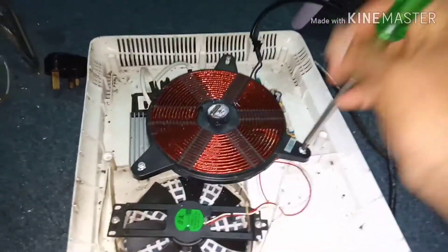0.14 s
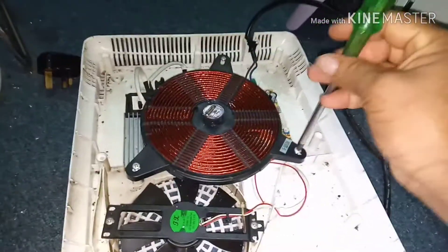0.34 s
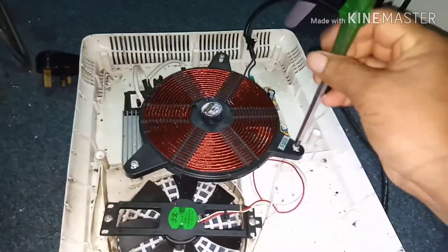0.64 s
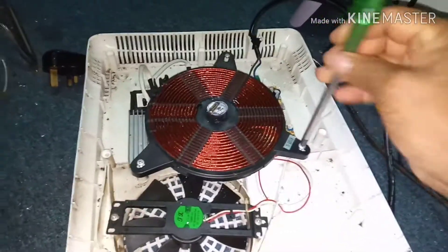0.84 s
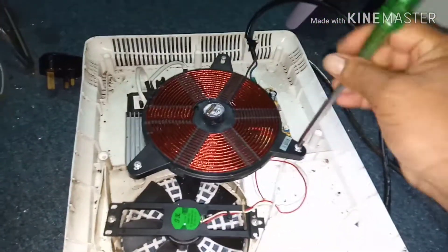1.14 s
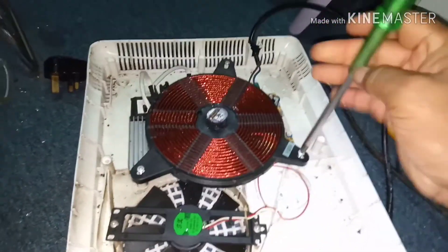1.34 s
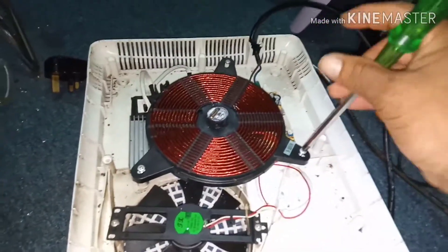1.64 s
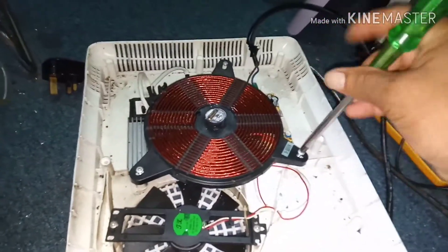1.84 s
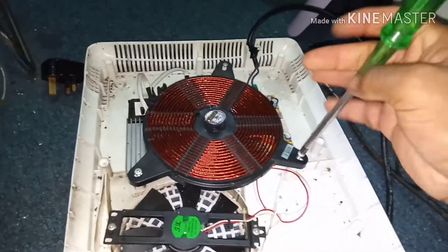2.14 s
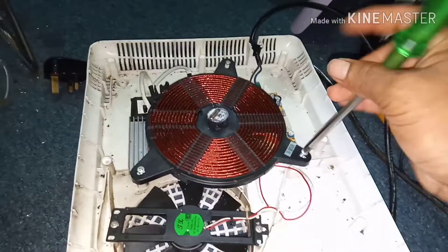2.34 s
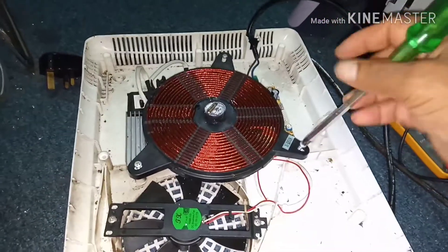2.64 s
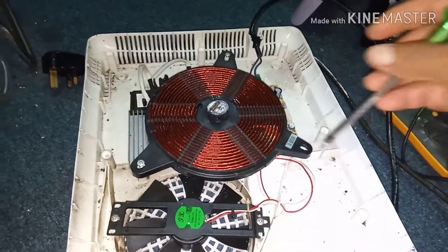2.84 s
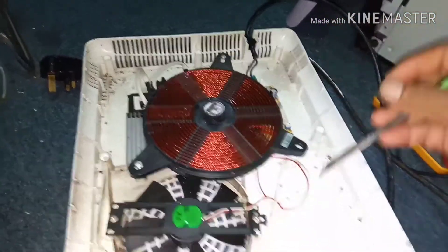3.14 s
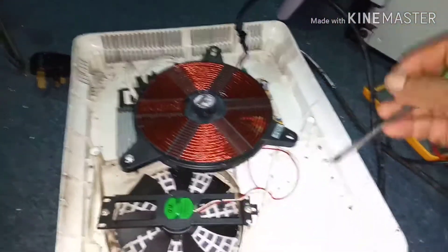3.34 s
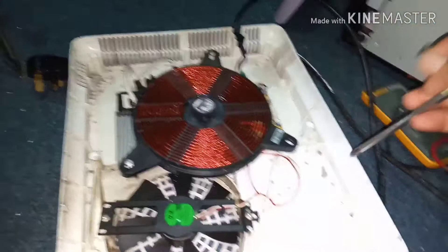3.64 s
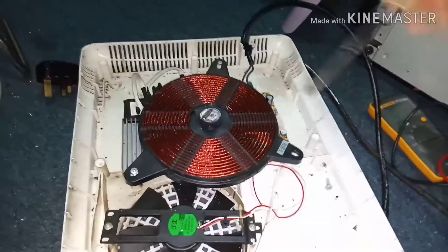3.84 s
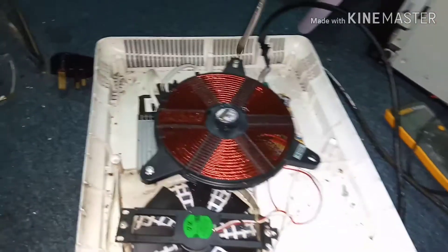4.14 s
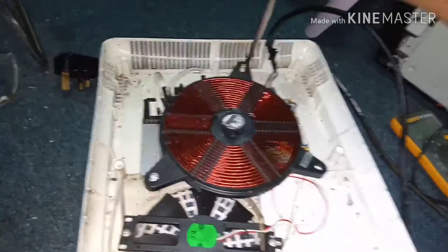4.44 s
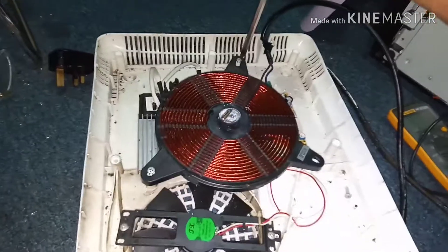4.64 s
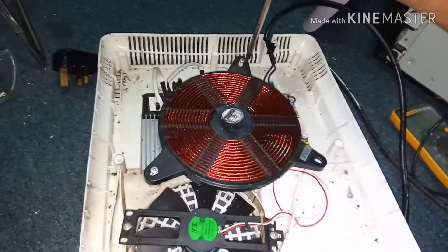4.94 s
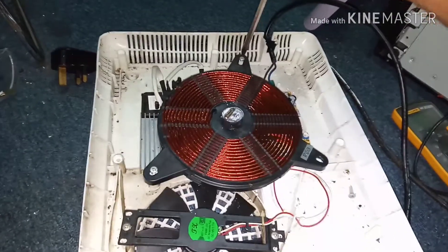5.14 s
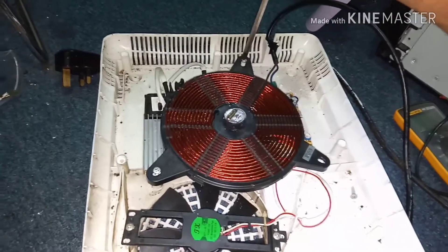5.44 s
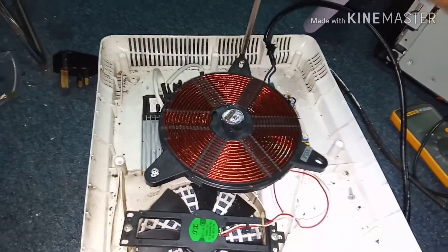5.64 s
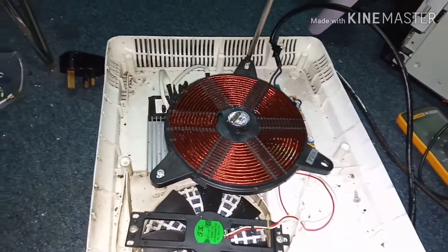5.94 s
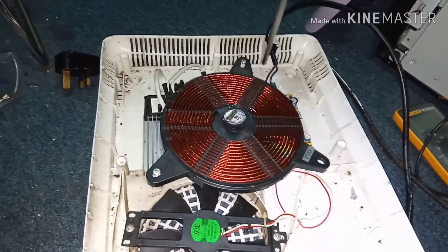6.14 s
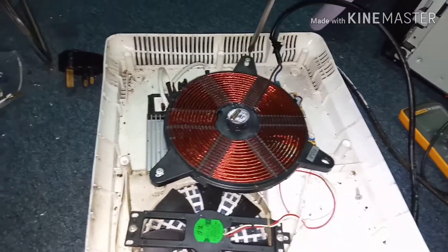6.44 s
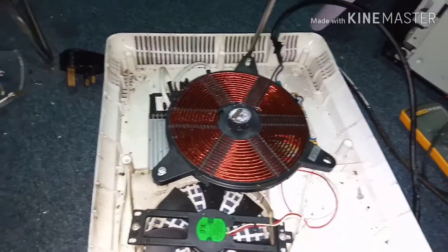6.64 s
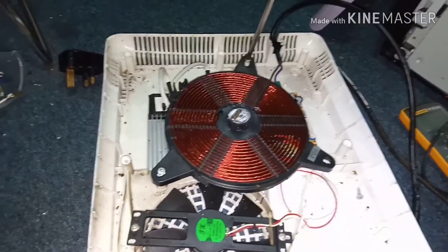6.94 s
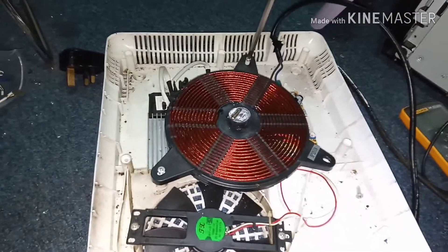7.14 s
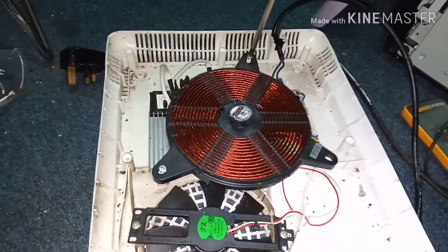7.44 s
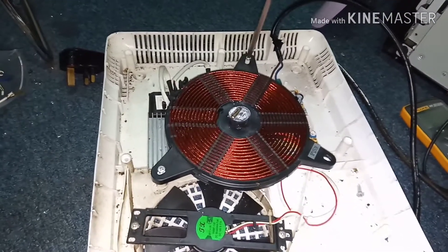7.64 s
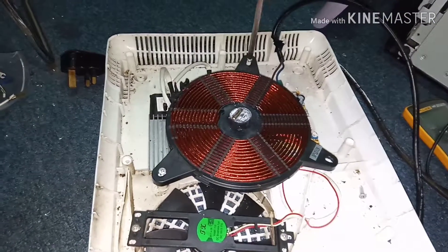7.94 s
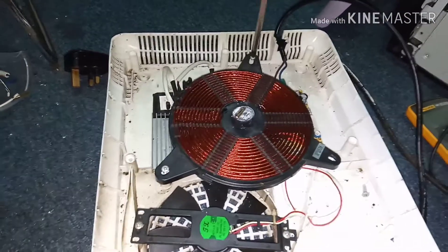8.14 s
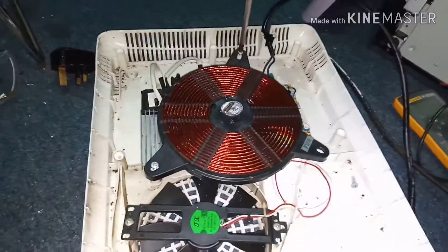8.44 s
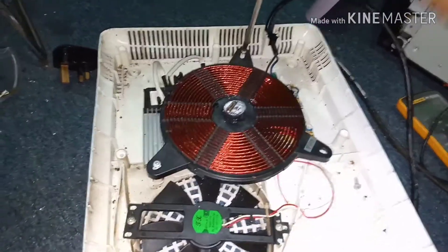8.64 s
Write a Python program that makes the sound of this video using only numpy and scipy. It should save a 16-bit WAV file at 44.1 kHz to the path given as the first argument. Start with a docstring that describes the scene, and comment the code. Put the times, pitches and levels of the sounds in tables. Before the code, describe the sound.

A screwdriver works small screws in a thin plastic housing, heard close with short, quiet reflections. Soft grip rustles and small metallic ticks and scrapes come first, then a brief bright clatter of steel on plastic. After over a second of only hum, hiss and faint handling, irregular loud knocks snap out, the strongest about two thirds through, before small ticks and soft rustling end it.

```python
"""First come fingers rustling on a handle, over a faint hum and hiss, close up in a small dead room.
A screwdriver backs small screws out of the plastic shell of an opened cooker: its blade ticks and grinds
in the screw heads, slips out with hard knocks, and clatters once against the shell.
Contacts and stick-slips ring resonances of plastic and steel, with short, quiet reflections;
hand, room and microphone are shaped noise, the hum a sine."""
import sys
import numpy as np
from scipy import signal
from scipy.io import wavfile

SR = 44100
rng = np.random.default_rng(int(sys.argv[2]) if len(sys.argv) > 2 else 0)


def wav_out(sig):
    """Save sig, one row per channel (or a flat mono array), as 16-bit PCM at SR to the path in sys.argv[1]."""
    wavfile.write(sys.argv[1], SR, np.round(np.clip(np.atleast_2d(sig).T, -1, 1) * 32767).astype(np.int16))


N = 388521
TIME = np.arange(N) / SR   # s, the whole scene
BLOW = np.arange(SR // 5) / SR   # s, one contact and its ring-out

# resonances of the whole plastic shell: (f/Hz, width/Hz, level/dB)
SHELL_MODES = [(208.6, 31, -2), (315, 78, -2), (440, 120, -11.5), (640, 68, -7)]
# resonances of the steel of the tool and screw: (f/Hz, width/Hz, level/dB)
STEEL_MODES = [(2220, 540, -4.5), (2680, 400, -2.5), (3022, 220, -3), (3717, 440, -14), (4400, 330, -17)]


def jumps():
    """The blade jumps out of the slot with a hard click and lands again just after."""
    # jumps: (t/s, panel peak about/dB, steel clack/dB, panel tilt/dB per octave, rattle/dB, rebound/dB);
    # clack and rebound are relative to the panel
    jump_rows = [(5.027, -25, -12, -7, -19, -25), (5.283, -7.5, -9.5, 1.5, -13.5, -13.5),
                 (5.914, -16, -7.5, -2, -15, -27), (6.095, -3.5, -19, 0, -15.5, -14),
                 (6.235, -9.5, -9.5, -6.5, -18, -27.5), (6.629, -11, -13, -1, -23.5, -18),
                 (6.872, -20.5, -12, 3, -38, -27), (7.357, -16.5, -13, -3.5, -12.5, -28),
                 (7.522, -8.5, -11, -6.5, -28.5, -22)]
    thump_db = -18   # relative to the panel
    full_scale_snap_db, snap_per_db = -28.5, 0.38   # relative to the clack; weaker jumps snap less
    rebound_delay_s, rebound_clack_db = .013, 0
    out = np.zeros(N)
    for s, db, clack_db, tilt_db, rattle_db, rebound_db in jump_rows:
        snap_db = clack_db + full_scale_snap_db + snap_per_db * db
        jump = blow(thump_db, clack_db, snap_db, tilt_db, rattle_db)
        add(out, s, from_db(db) * room(jump))
        rebound = touch(rebound_clack_db, edge_hz=4500)
        add(out, s + rebound_delay_s, from_db(db + rebound_db) * rebound)
    return out


def knocks():
    """The tool strikes the shell and clatters; the more steel in the contact, the brighter the panel."""
    # knocks: (t/s, panel peak about/dB, shell thump/dB, steel clack/dB, edge snap/dB);
    # the last three are relative to the panel
    knock_rows = [(1.806, -22, -3, -12.5, -37.5), (3.099, -13, -10, -7.5, -33),
                  (3.119, -32.5, -20, 8.5, -29), (3.144, -26.5, -12, -1.5, -47),
                  (3.234, -17.5, -2.5, -7.5, -29.5), (3.37, -10, -6.5, 3, -30.5),
                  (3.393, -16, -27.5, 7.5, -11.5), (3.431, -37, -31, 12, -7.5), (3.441, -24, -26, 7.5, -10),
                  (3.459, -31.5, -24, -1.5, -31), (3.489, -11, -12.5, -1.5, -26.5)]
    base_tilt_db, tilt_per_clack = 1.83, .2   # dB per octave, and its rise per dB of clack
    out = np.zeros(N)
    for s, db, thump_db, clack_db, snap_db in knock_rows:
        tilt_db = base_tilt_db + tilt_per_clack * clack_db
        knock = blow(thump_db, clack_db, snap_db, tilt_db, rattle_db=-17.5)
        add(out, s, from_db(db) * room(knock))
    return out


def ticks():
    """The blade shifts in the screw head; firmer ticks ring the steel more."""
    # light ticks: (t/s, level before softening/dB)
    tick_rows = [(0.878, -40.5), (1.257, -35.5), (1.288, -34), (1.317, -40), (1.335, -29.5), (1.388, -37.5),
                 (1.525, -36), (1.921, -34), (2.041, -30), (2.085, -36.5), (2.328, -29.5), (2.472, -29.5),
                 (2.746, -36.5), (6.073, -28), (6.788, -34.5), (7.153, -31), (7.517, -23), (7.655, -42.5),
                 (7.892, -45.5), (7.928, -35.5), (8.131, -44), (8.235, -35), (8.428, -33.5)]
    typical_db, typical_clack_db = -35, -15.5   # clack relative to the panel
    clack_per_db = .5
    out = np.zeros(N)
    for s, db in tick_rows:
        clack_db = typical_clack_db + clack_per_db * (db - typical_db)
        add(out, s, from_db(db) * touch(clack_db, edge_hz=3400))
    return out


def grinding(slips_per_s=400, clack_db=-9, thump_db=-7):
    """Tiny stick-slips of uneven size under each turn of the blade ring panel, steel and shell."""
    # grinds, before the room: (middle t/s, half length/s, level/dB)
    grind_rows = [(.45, 0.15, -69.5), (0.9, 0.068, -58.5), (1.273, 0.036, -48), (1.355, 0.057, -54.5),
                  (1.943, 0.028, -50), (2.052, 0.019, -42.5), (2.345, 0.042, -51), (2.475, 0.035, -52.5),
                  (2.7, 0.089, -59.5), (5.919, 0.0057, -22.5), (6.058, .006, -40), (6.072, 0.0039, -31),
                  (6.786, 0.014, -50), (7.153, 0.0081, -44), (7.664, 0.026, -50.5), (8.336, 0.072, -58)]
    sizes_db = 4 * np.minimum(rng.exponential(1, N), 3)
    sizes = rng.choice([-1, 1], N) * from_db(sizes_db)
    slips = (rng.random(N) < slips_per_s / SR) * sizes
    body = panel(slips, tilt_db=2.5)
    body = body + from_db(clack_db) * resonate(slips, STEEL_MODES)
    body = body + from_db(thump_db) * resonate(slips, SHELL_MODES)
    body = soften(body, edge_hz=3540)
    return swells(grind_rows) * body / rms(body)


def touch(clack_db, edge_hz):
    """A light contact of the blade with the screw, softened by a low-pass."""
    tick = blow(thump_db=-21.5, clack_db=clack_db, snap_db=-33.5, tilt_db=-4.0, rattle_db=-11.5)
    return room(soften(tick, edge_hz, order=2))


def blow(thump_db, clack_db, snap_db, tilt_db, rattle_db):
    """A contact rings the plastic panel (peak near 1), the whole shell, the steel and its sharp edge."""
    # resonances of the steel's sharp edge: (f/Hz, width/Hz, level/dB)
    edge_modes = [(6260, 1300, -2.5), (8460, 1400, -4.5), (12400, 9100, -18.5)]
    # ringing modes of the coil and its metal parts: (f/Hz, level/dB)
    metal_modes = [(765, 2.5), (1125, -8), (1723, -6), (2130, -4), (2549, -2.5), (2640, -5), (2755, -7.5),
                   (3020, -4.5), (3268, -10), (3450, -9.5), (3892, -9)]
    metal_t60_s = .15
    force = contact(rattle_db)
    shell_tilt_db = -.8 * (max(thump_db, -24) + 13)   # heavier thumps favour the lowest mode
    shell = soften(resonate(force, SHELL_MODES, shell_tilt_db, scatter=1.0), edge_hz=4200, order=2)
    steel = soften(resonate(force, STEEL_MODES, scatter=1.0), edge_hz=4700, order=8)
    skid = rng.standard_normal(len(BLOW)) * from_db(-60 * BLOW / 0.029)   # the edge skids for a few ms
    edge = soften(resonate(skid, edge_modes, scatter=0.93), edge_hz=8600, order=2)

    # each part is levelled by its attack, with a small trim
    levels = ((0, panel(force, tilt_db)), (thump_db + 0.5, shell),
              (clack_db + 0.37, steel), (snap_db - 0.3, edge))
    parts = sum(from_db(db) * part / attack_rms(part) for db, part in levels)
    metal = 0
    for hz, db in metal_modes:
        metal = metal + from_db(db + rng.normal(0, 3)) * np.sin(2 * np.pi * hz * BLOW)
    metal = from_db(clack_db - 14.5 - 60 * BLOW / metal_t60_s) * metal
    return from_db(-11) * (parts + metal)   # from attack level to a peak near 1


def contact(rattle_db, bounce_db=-8):
    """One sharp push, a few ms of bouncing, then loose parts rattling out."""
    force = 1.0 * (BLOW == 0)
    for db, t60_s in ((bounce_db, .02), (rattle_db, .08)):
        grains = rng.standard_normal(len(BLOW)) ** 3   # cubing makes a few grains stand out
        grains = grains * from_db(-60 * BLOW / t60_s)
        force = force + from_db(db) * grains / np.linalg.norm(grains)
    return force


def panel(force, tilt_db, low_hz=800, high_hz=2000):
    """The small stiff panel radiates little below its first mode or above its last."""
    # resonances of the panel: (f/Hz, width/Hz, level/dB)
    panel_modes = [(950, 170, 0), (1090, 170, -2), (1290, 200, 0), (1470, 220, -1), (1680, 220, -6)]
    sos = signal.butter(4, [low_hz, high_hz], "band", fs=SR, output="sos")
    return signal.sosfilt(sos, resonate(force, panel_modes, tilt_db, scatter=1))


def resonate(force, modes, tilt_db=0, scatter=0):
    """Parallel resonances tilted in dB per octave; scatter shifts and weights them anew at each call."""
    out = 0
    for k, (hz, width, db) in enumerate(modes):
        shift, weight_db = rng.normal(0, (.015, 1.8)) * scatter
        r = np.exp(-np.pi * width / SR)   # pole radius: wider modes die sooner
        w = 2 * np.pi * hz * (1 + shift) / SR
        ringing = signal.lfilter([1, 0, -1], [1, -2 * r * np.cos(w), r * r], force + 1e-18)
        gain = from_db(db + tilt_db * np.log2(hz / modes[0][0]) + weight_db)
        out = out + (-1) ** k * gain * (1 - r * r) / 2 * ringing   # neighbours in opposite sign
    return out


def room(x, wet_db=-11, build_s=0.0016):
    """Reflections build up within a few ms and die quickly, in a fresh noise pattern at each call."""
    # the small dead room: (f/Hz, t60/s, level of the reflections/dB)
    room_rows = np.array([(150, .22, -0.5), (500, .18, 2), (1130, .15, -4), (2980, 0.13, 0),
                          (7000, 0.1, -0.5), (14000, .1, -3)])
    tail = 0
    for hz, noise in bands(len(BLOW), 100, 16000, count=9):
        level_db = at_hz(room_rows[:, ::2], hz)
        t60_s = at_hz(room_rows[:, :2], hz)
        tail = tail + noise * from_db(level_db - 60 * BLOW / t60_s)
    tail = tail * (1 - np.exp(-(BLOW / build_s) ** 2))
    reflections = signal.fftconvolve(x, tail / np.linalg.norm(tail))[:len(x)]
    return x + from_db(wet_db) * reflections


def background(hum_db=-64.0, rumble_db=-60, mic_db=-86.5):
    """Mains hum, low room noise, a wavering hiss, the hand on the handle and the microphone's own noise."""
    # the hand shifts its grip:
    # (middle t/s, half length/s, friction hiss level/dB, low handling level/dB, skin rustle level/dB)
    strokes = [(0.175, 0.23, -65, -68, -88), (0.74, 0.16, -67, -70, -79.5), (1.318, 0.078, -68, -61, -84),
               (2.127, 0.22, -61.5, -59, -79), (2.486, 0.045, -74, -57, -83),
               (2.944, 0.16, -66.5, -72.5, -76.5), (4.226, 0.37, -70, -69, -98.5),
               (6.853, 0.23, -66, -73, -98), (8.179, 0.52, -67, -71.5, -90)]
    # noise spectra of room, hand, friction and skin: (f/Hz, level/dB per Hz)
    rumble_spectrum = [(22, -24), (45, -11), (70, -2), (100, 1), (130, -3), (185, -1.5), (240, -15),
                       (330, -34)]
    handling_spectrum = [(200, 0), (300, -1), (450, -9), (700, -5), (1000, -13.5)]
    hiss_spectrum = [(800, -10.5), (1100, 1.5), (1700, 2.5), (2400, 4.5), (2900, 0), (3600, 0),
                     (4200, -8.5), (4700, -11), (5000, -24)]
    rustle_spectrum = [(3500, 4), (4700, 8), (5600, -8.5), (7000, -4.5), (7700, -4), (8700, 1), (9700, -8)]
    mains_hz = 50
    floor_hiss_db, floor_low_db = -69.5, -75   # steady floor between the strokes

    s, half, *levels = np.transpose(strokes)
    friction, grip, skin = [swells(zip(s, half, db)) for db in levels]
    hum_phase = 2 * np.pi * 2 * mains_hz * TIME + 0.33 * drift(5.9)   # twice the mains, wandering
    hum = from_db(hum_db) * np.sqrt(2) * np.sin(hum_phase)
    rumble = from_db(rumble_db) * wavering_noise(rumble_spectrum, waver_db=3.5, rate=6.2, count=9)
    handling = wavering_noise(handling_spectrum, waver_db=5, rate=9, count=12)
    hiss = wavering_noise(hiss_spectrum, waver_db=4.8, rate=9, count=26)
    rustle = skin * wavering_noise(rustle_spectrum, waver_db=9.0, rate=11, count=14)
    # floor and strokes add as powers
    low = np.hypot(from_db(floor_low_db), grip) * handling
    high = np.hypot(from_db(floor_hiss_db), friction) * hiss
    mic = from_db(mic_db) * rng.standard_normal(N)
    return hum + rumble + low + high + rustle + mic


def wavering_noise(spectrum, waver_db, rate, count):
    """Noise of rms 1 that swells and fades in patches a few bands wide."""
    out, patch = 0, drift(rate)
    for hz, noise in bands(N, spectrum[0][0], spectrum[-1][0], count):
        patch = .4 * patch + .9 * drift(rate * rng.uniform(.7, 1.3))   # partly shared with the band below
        level_db = at_hz(spectrum, hz) + waver_db * 2 * np.tanh(patch / 2)
        out = out + noise * from_db(level_db)
    return out / rms(out)


def bands(size, low_hz, high_hz, count):
    """Adjoining bands of white noise, neighbours from separate sources: (centre Hz, noise)."""
    edges = np.geomspace(low_hz, high_hz, count + 1)
    white = rng.standard_normal((2, size))
    for k, (low, high) in enumerate(zip(edges, edges[1:])):
        sos = signal.butter(3, [low, high], "band", fs=SR, output="sos")
        yield np.sqrt(low * high), signal.sosfilt(sos, white[k % 2])


def drift(rate):
    """Slow random wander: normal values, rate of them per second, joined by straight lines."""
    knots = rng.standard_normal(1024)
    return np.interp(TIME * rate, np.arange(len(knots)), knots)


def swells(rows):
    """Bell-shaped strokes (middle s, half length s, dB) as one gain curve."""
    return sum(from_db(db) * np.exp(-((TIME - s) / half) ** 2) for s, half, db in rows)


def soften(x, edge_hz, order=4):
    """Causal low-pass."""
    return signal.sosfilt(signal.butter(order, min(edge_hz, .45 * SR), fs=SR, output="sos"), x)


def from_db(db):
    """Decibels to gain."""
    return 10 ** (np.asarray(db) / 20)


def rms(x):
    """Root mean square."""
    return np.sqrt(np.mean(x ** 2) + 1e-24)


def attack_rms(x):
    """Level of the first 12 ms of a blow."""
    return rms(x[:int(.012 * SR)])


def at_hz(points, hz):
    """Read a table of (Hz, value) on a log-frequency axis."""
    f, value = np.transpose(points)
    return np.interp(np.log(hz), np.log(f), value)


def add(out, s, sound):
    """Mix a sound in at time s."""
    start = max(0, round(s * SR))
    out[start:start + len(sound)] += sound[:N - start]


def scene():
    """The work on the screws in its room, over the background."""
    return (jumps() + knocks() + ticks() + room(grinding()) + background())[None]


def record(dry):
    """A steep elliptic low-pass cuts the top of the band."""
    cutoff_hz = 15700
    sos = signal.ellip(10, .1, 80, cutoff_hz, fs=SR, output="sos")   # .1 dB ripple, 80 dB down
    return signal.sosfilt(sos, dry)


dry = scene()
out = record(dry)
wav_out(out)
```